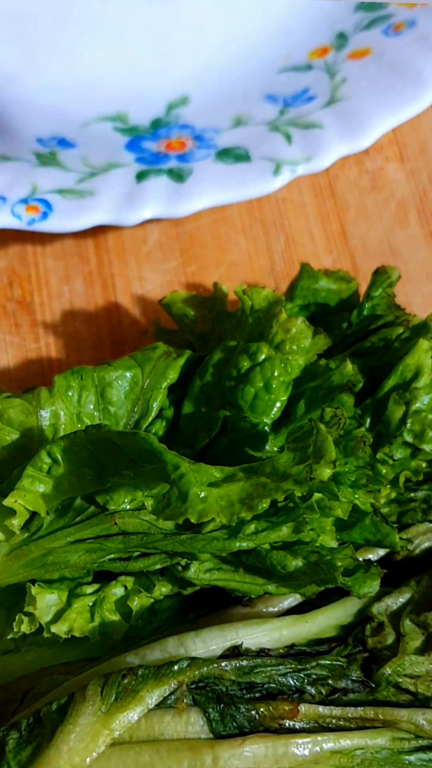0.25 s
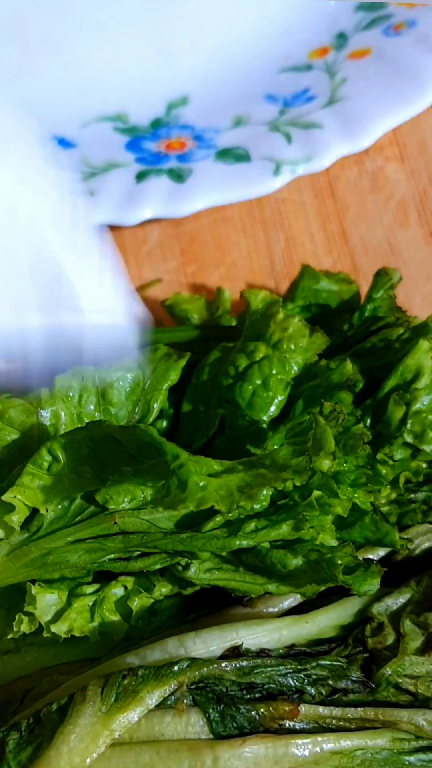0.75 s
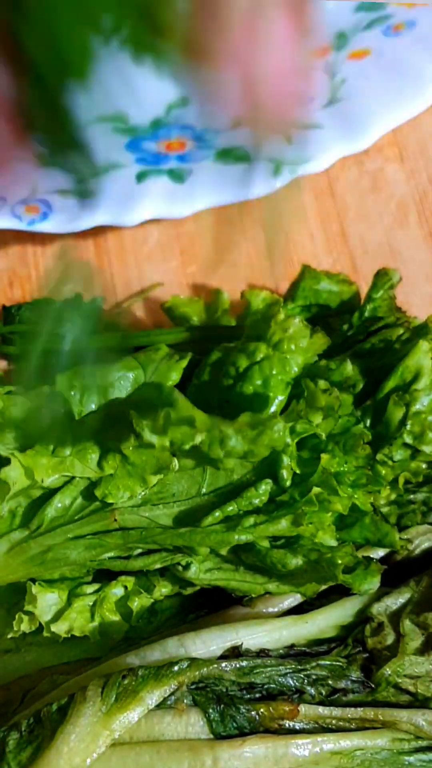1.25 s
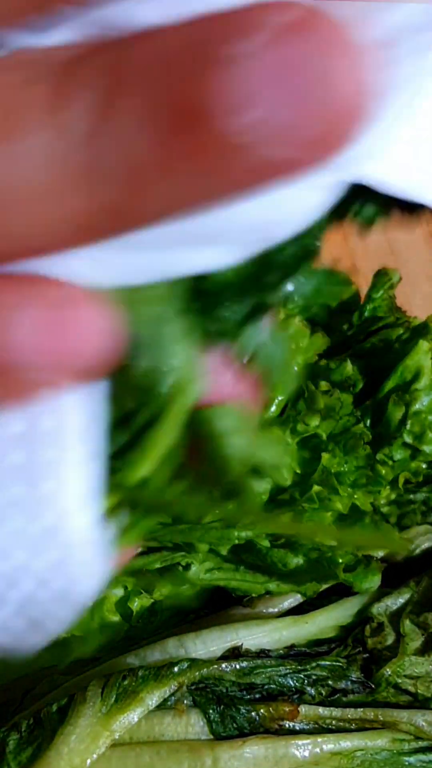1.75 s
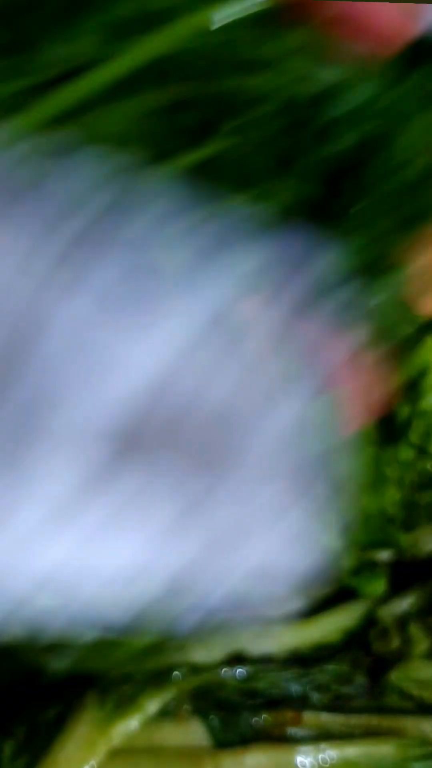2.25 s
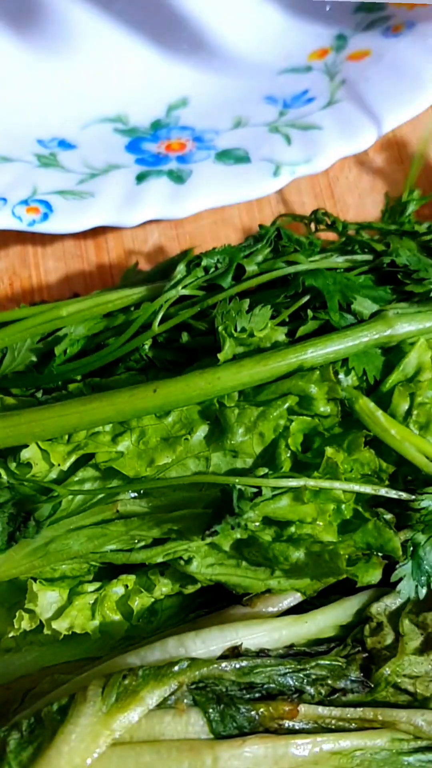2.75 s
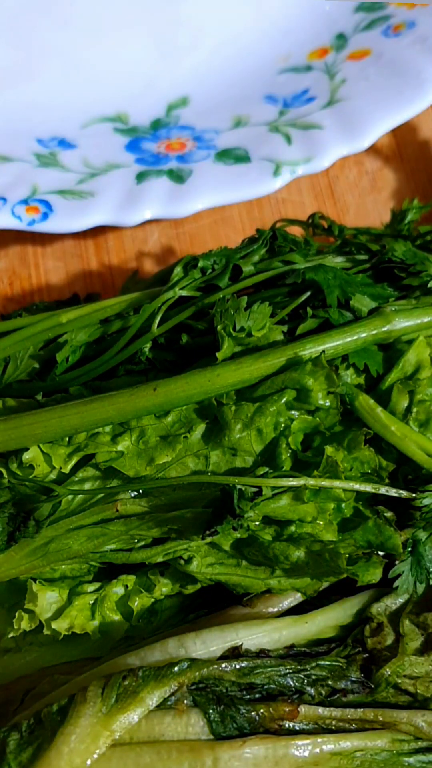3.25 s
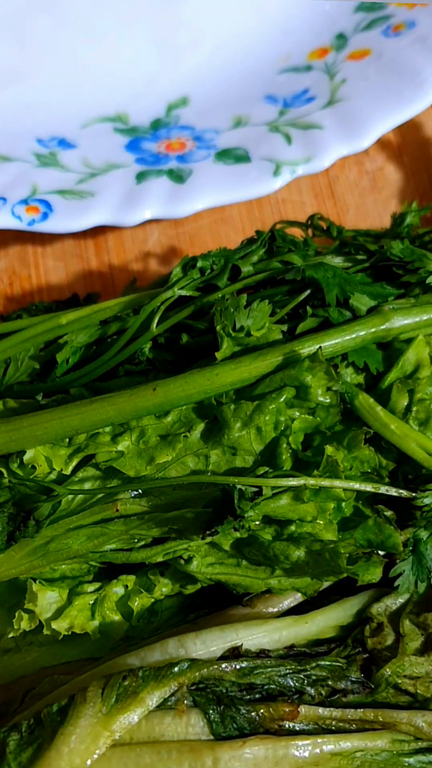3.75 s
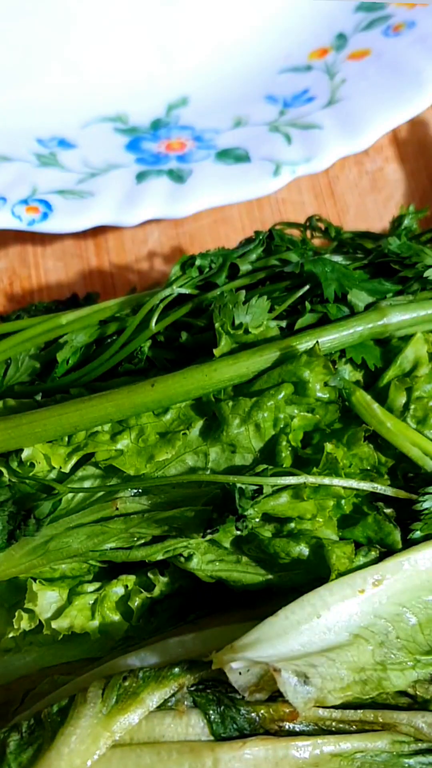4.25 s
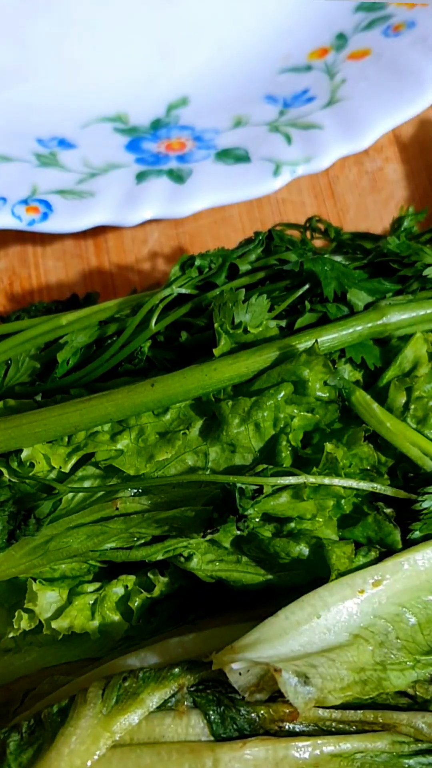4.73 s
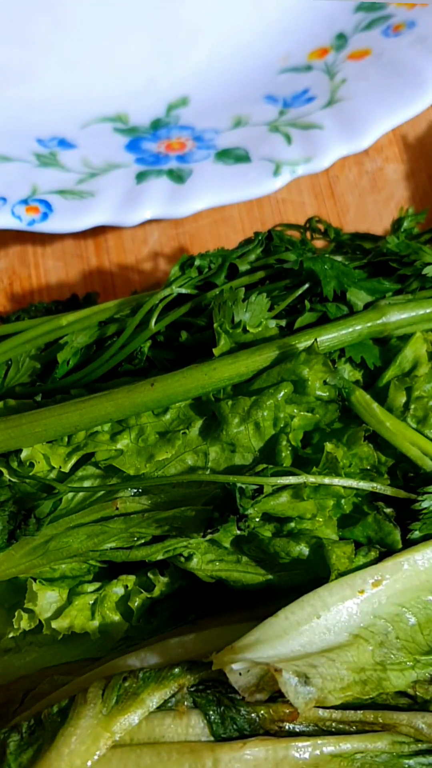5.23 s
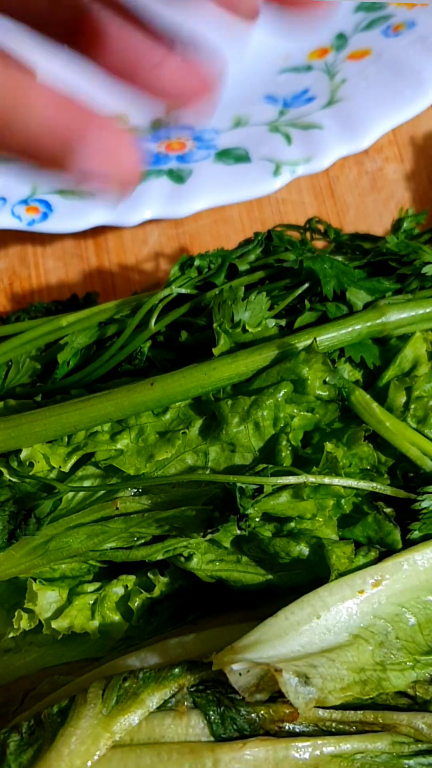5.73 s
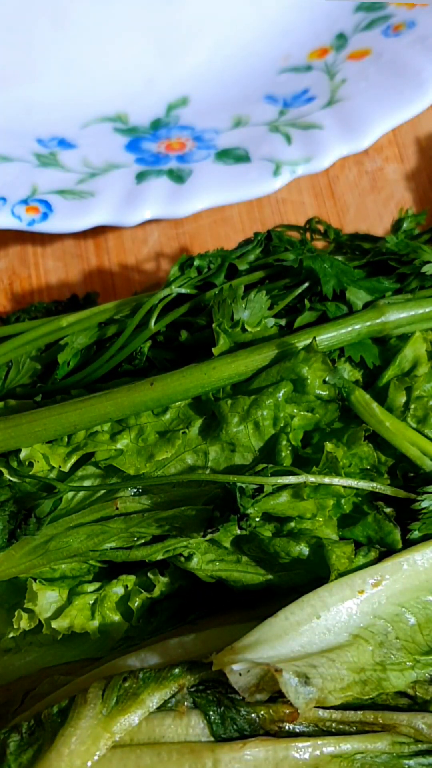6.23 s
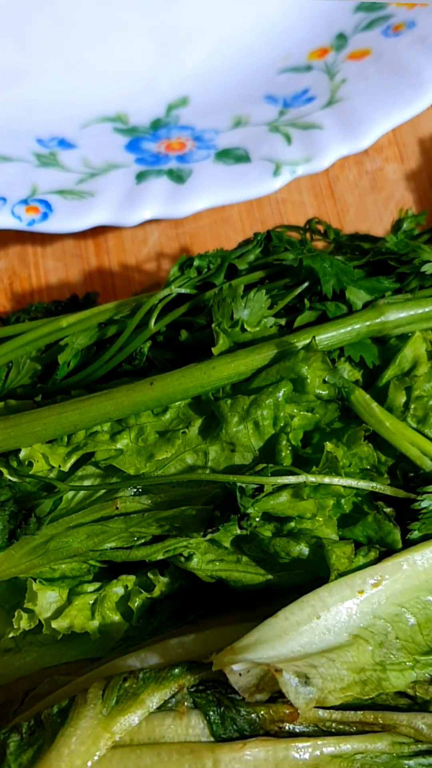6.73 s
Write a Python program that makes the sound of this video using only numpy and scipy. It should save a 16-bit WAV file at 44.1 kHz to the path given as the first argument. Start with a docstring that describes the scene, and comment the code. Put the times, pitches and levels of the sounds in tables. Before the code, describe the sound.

Leafy greens and a paper towel rustle right beside a hand-held microphone, mostly on the left. At first a low handling rumble runs underneath, and several sharp brushes over the microphone bring crisp snaps and puffs of air. The rustling then comes in lighter strokes, pauses for a faint plate clack and dull thuds, and returns as a crackly stretch before thinning out. Quiet kitchen room noise lies behind.

```python
"""Leaves rustle up close, over the low rumble of a hand shifting on a hand-held camera.
Leafy greens are being laid out on a wooden board. Leaves, hand and a paper towel stick and slip
in many tiny clicks near the left microphone opening (the port); several times they brush right
over it and push a puff of air in. Things knock softly in the kitchen, a faint motor hums behind
the low room noise, and a soft rising moan comes in near the end."""
import sys
import numpy as np
from scipy import signal
from scipy.fft import rfft, irfft, next_fast_len
from scipy.io import wavfile
from scipy.ndimage import uniform_filter1d

SR = 44100
rng = np.random.default_rng(int(sys.argv[2]) if len(sys.argv) > 2 else 0)


def dump(signal):
    """Clip the signal to [-1, 1] and save it as 16-bit WAV at the path in sys.argv[1]."""
    limited = np.clip(np.atleast_2d(signal).T, -1, 1)
    pcm = np.round(limited * 32767).astype(np.int16)
    wavfile.write(sys.argv[1], SR, pcm)


N = 307906
T = np.arange(N) / SR
HZ = np.fft.rfftfreq(next_fast_len(N, True), 1 / SR)

# tone colour of the room noise on each side: f/Hz, level/dB
ROOM_LEFT_COLOUR = [(20, -16), (80, 6), (200, -0.5), (350, 8), (450, -1), (620, -3.5), (1300, -15.5),
                    (2400, -15), (4500, -20), (8000, -23), (15000, -29.5)]
ROOM_RIGHT_COLOUR = [(20, -35.5), (45, -2), (85, 5), (150, -2.5), (290, -12.5), (500, -26.5), (1200, -33),
                     (3500, -36), (7500, -50.5), (10500, -45), (15500, -44.5)]
# a far motor swells and fades: t/s, level/dB, rise/s, hold/s, fall/s, f/Hz
MOTOR_SWELLS = [(2.32, -54, .36, 0.06, 0.064, 130.3), (2.744, -59.5, 0.09, .27, 0.18, 127),
                (5.2, -54, 0.27, 0.97, 0.14, 109)]

# touches that make something ring: t/s, level/dB, rise/s, hold/s, fall/s
HOLLOW_KNOCKS = [(2.592, -46, 0.0087, 0.0043, 0.0037), (2.615, -50.5, 0.008, 0.024, 0.031)]
PLATE_CLACKS = [(4.337, -55.5, .004, .04, 0.027), (4.412, -65.5, .008, 0.014, 0.033)]
LOW_THUDS = [(4.36, -46.5, 0.02, 0.012, 0.02), (4.45, -47, 0.028, 0.088, 0.032)]
ROOM_SCRAPES = [(4.79, -52.5, 0.014, 0.052, 0.035), (4.91, -54.5, 0.027, 0.015, 0.024)]
FINGER_SCUFFS = [(.08, -53.5, 0.041, 0.082, 0.059), (4.25, -63.5, 0.033, 0.033, 0.014),
                 (4.63, -61, 0.022, .03, 0.011), (6.67, -57.5, 0.067, 0.03, 0.046),
                 (6.84, -60, 0.095, 0.11, 0.039)]  # on the camera case
STALK_CREAKS = [(.35, -44, 0.0072, 0.032, 0.0075), (.68, -47.5, 0.017, 0.015, 0.017),
                (2.9, -66.5, 0.0095, 0.13, 0.014), (3.68, -60.5, 0.011, 0.017, 0.012),
                (6.56, -58, 0.011, 0.05, 0.03)]
# the tones (modes) each of those things rings at: f/Hz, width/Hz, relative level/dB
KNOCK_TONES = [(608, 110, -3.5), (741, 68, 3), (975, 260, -10.5)]
PLATE_TONES = [(312, 180, -3.5), (834, 140, -7), (1300, 130, -1.5), (1740, 250, -13.5), (2490, 420, -8),
               (4000, 590, -10.5), (5300, 430, -7), (6500, 350, -11.5)]
THUD_TONES = [(44, 12, 0)]
SCRAPE_TONES = [(447, 65, -5), (637, 130, -5.5), (852, 79, -1), (1155, 67, -12), (1590, 140, -15.5)]
SCUFF_TONES = [(363, 52, 2), (509, 120, -6)]
STALK_TONES = [(2090, 700, -4), (3170, 1000, 0)]

# the hand shifts on the case: t/s, length/s, low part level/dB, upper part level/dB
HAND_SHIFTS = [(-.03, 0.53, -47, -45.5), (0.619, .28, -49.5, -47), (.9, 0.8, -51.5, -55),
               (1.666, 0.67, -49, -52.5)]
# tone colour of the low and upper parts of that rumble: f/Hz, level/dB
HAND_LOW_COLOUR = [(15, -26), (40, -2.5), (125, 4.5), (170, -15.5), (260, -21), (600, -67)]
HAND_UPPER_COLOUR = [(80, -10), (190, 5.5), (370, -9), (520, -19.5), (1200, -54)]
# crisp snaps: t/s, peak level/dB
CRISP_SNAPS = [(0.2994, -27), (1.2755, -22), (1.2936, -16), (1.9097, -23), (1.986, -30.5), (3.4539, -30.5),
               (3.594, -38.5), (4.664, -57), (5.127, -39.5), (6.463, -42), (6.816, -53)]
# brushes over the port: t/s, scratch level/dB, treble gain/dB, rise/s, fall/s, air puff level/dB
PORT_BRUSHES = [(0.298, -35, -1, 0.0045, .0068, -25.5), (1.276, -32.5, 1.5, 0.024, 0.018, -21),
                (1.292, -22, 4, 0.0049, .011, -19.5), (1.527, -27.5, -1, 0.013, 0.0097, -22),
                (1.695, -26.5, -2.5, 0.0099, .011, -21.5), (1.913, -26.5, -5, 0.0053, .0065, -22),
                (2.03, -31, 3, 0.0059, 0.0097, -15), (2.147, -35, 2, 0.0055, 0.014, -23.5)]
# tone colour of brushing and of rubbing: f/Hz, level/dB
SCRATCH_COLOUR = [(160, -4.5), (280, 3), (618, -1), (782, -0.5), (990, -8.5), (1670, -5), (2680, -6),
                  (2910, -8), (3810, -5.5), (4220, -10), (5250, -11.5), (7730, -17), (15700, -27)]
RUSTLE_COLOUR = [(240, -35.5), (400, -8), (751, -1.5), (862, -5.5), (1320, -6), (2130, -1), (2300, -1),
                 (2940, -2.5), (3330, 0.5), (4590, -2.5), (6250, -1.5), (8360, -5.5), (12300, -10),
                 (15700, -17.5)]
# a leaf edge catches and lets go: t/s, level/dB
LEAF_CATCHES = [(.236, -61), (.638, -53), (0.921, -59.5), (2.896, -69), (3.006, -66), (3.311, -59),
                (3.753, -41), (3.845, -45.5), (4.331, -62), (5.125, -51), (5.326, -44), (5.449, -50),
                (5.61, -39.5), (5.891, -54), (6.461, -58.5), (6.544, -50), (6.869, -53.5)]
# strokes of rubbing: t/s, length/s, level/dB, growth/dB, body (bass) gain/dB, fizz (treble) gain/dB
RUB_STROKES = [ (-.02, .1, -58, -11, -5.5, -8.5), (.08, 0.16, -72.5, -3, 5, -1.5),
               (.222, 0.074, -62, -2, 1.5, -4.5), (0.276, 0.095, -48, -1, 0, -5),
               (.38, .11, -49, -2.5, -4.5, -8.5), (.49, 0.22, -61, 10, -8, -2.5),
               (0.611, 0.11, -48, 1, -7.5, -4.5), (0.733, 0.035, -41.5, -4.5, -15.5, -5.5),
               (.79, 0.1, -68, 2, 1.5, -7), (.902, 0.091, -59.5, 2.5, -2, -10),
               (1.0, 0.077, -66.5, 0, -4, -3), (1.1, 0.086, -70.5, 2, 2.5, -2),
               (1.185, .072, -53.5, 16, -7.5, -8.5), (1.31, .14, -54.5, -0.5, -5.5, -9.5),
               (1.46, 0.039, -51.5, -2, -8, -6), (1.541, 0.083, -56, -8.5, -6.5, -8),
               (1.71, 0.12, -54, 13, -9.5, -8), (1.84, 0.088, -60.5, 8, -9, -5),
               (1.927, 0.053, -56, 13.5, -7.5, -10), (2.05, 0.05, -55, 3, -8, -8),
               (2.155, 0.057, -56.5, 8, -6.5, -6.5), (2.23, 0.37, -77, 3, 4, 3.5),
               (2.671, 0.067, -79, -2, 3, 6), (2.882, 0.075, -67.5, -13, 2.5, -10.5),
               (2.988, 0.036, -63, -3, -2, -8), (3.08, 0.076, -82, -3, 14.5, -9),
               (3.27, 0.065, -70.5, 17, 1, 2), (3.324, 0.13, -52.5, 0, -7.5, -4.5),
               (3.47, 0.11, -67.5, 9, -6, -1), (3.538, 0.069, -55.5, 6.5, -8.5, -5),
               (3.62, 0.14, -61, 8, -4, -3), (3.735, 0.16, -53.5, -4, -6.5, -5.5),
               (4.032, 0.02, -69, 4.5, -12, 5), (4.6, .16, -71.5, 7, -6, -4),
               (4.855, 0.31, -53.5, 4, -6.5, -7.5), (5.1, .16, -52.5, 1.5, -8, -8),
               (5.273, 0.049, -53, 10, -8.5, -1), (5.315, .1, -40, -8.5, -9.5, -5.5),
               (5.439, .15, -47, -5, -11.5, -5), (5.596, 0.055, -45.5, -0.5, -11, -2),
               (5.664, 0.045, -49, 3, -9.5, -1.5), (5.735, 0.11, -49.5, 3.5, -13.5, -7),
               (5.872, 0.04, -55, -7, -22, -1.5), (5.93, 0.12, -73, -6, -6, -7),
               (6.032, 0.13, -60, -4, -10.5, -10), (6.172, 0.049, -64, -1, -10, -9),
               (6.25, .27, -71, 2, -9, -2), (6.439, 0.024, -57.5, 7, -19, -8),
               (6.525, 0.078, -54.5, -4, -15, -3.5), (6.61, 0.19, -58.5, 3, -9.5, -6.5),
               (6.795, 0.17, -58.5, 0, -23, -3.5)]
# what reaches the far (right) port from the near (left) one: f/Hz, gain/dB
FAR_PORT_GAIN = [(60, -13), (250, -8.5), (600, -24), (1000, -21.5), (1650, -22), (2600, -26.5),
                 (3300, -26.5), (4600, -27), (6300, -34), (7700, -32.5), (9700, -16.5), (11500, -21),
                 (15000, -31.5)]


def amp(db):
    return 10 ** (np.asarray(db) / 20)


def unit(x):
    """Scale a signal to an average (RMS) size of 1."""
    return x / np.sqrt(np.mean(x ** 2) + 1e-20)


def shape(points):
    """Gain at every frequency, drawn through a few (Hz, dB) points."""
    hz, db = np.transpose(points)
    return amp(np.interp(np.log(HZ + 1), np.log(hz), db))


def peak(hz, width):
    """Gain that favours one ringing tone."""
    return 1 / (1 + (2 * (HZ - hz) / width) ** 2)


def below(hz, steepness):
    """Gain that lets through what lies below hz."""
    return 1 / (1 + (HZ / hz) ** steepness)


def filtered(x, gain):
    size = next_fast_len(N, True)
    return irfft(rfft(x, size) * gain, size)[:N]


def noise(gain):
    return unit(filtered(rng.standard_normal(N), gain))


def wander(hz):
    """A random drift of size 1, changing up to about hz times a second."""
    return noise(below(hz, 4))


def swell(s, rise, hold, fall):
    """Loudness curve that grows to 1 at time s, holds and dies away."""
    return np.exp(-(np.maximum(s - T, 0) / rise) ** 1.73 - np.maximum(T - s - hold, 0) / fall)


def stroke(start, length, growth_db, attack, release):
    """Loudness curve of a slide: a quick start, an even growth or decline, then a fade."""
    t = T - start
    hold = amp(growth_db * (np.clip(t / length, 0, 1) - .5))
    return np.clip(t / attack, 0, 1) * hold * np.exp(-np.maximum(t - length, 0) / release)


def room_noise():
    """Low, slightly wavering noise, different on each side."""
    left = amp(-68) * noise(shape(ROOM_LEFT_COLOUR)) * amp(1.3 * wander(3.6))
    right = amp(-56) * noise(shape(ROOM_RIGHT_COLOUR)) * amp(.5 * wander(13))
    return np.array([left, right])


def moan(start=6.15, start_hz=188.7, climb_hz_per_s=92):
    """Two soft bands of noise come in and climb in pitch together."""
    hz = start_hz + climb_hz_per_s * (T - start)
    phase = 2 * np.pi * np.cumsum(hz) / SR
    level = amp(-65.5) * swell(start, rise=.13, hold=1, fall=1)
    lower = level * unit(wander(25) * np.cos(phase))
    upper = level * unit(wander(78) * np.cos(1.6 * phase))
    return amp([[-14], [0]]) * lower + amp([[-7], [-12]]) * upper  # left and right gains


def motor(sag_hz_per_s=2):
    """A far motor's wavering hum, mostly on the right; its pitch sags during each swell."""
    drift, hum = 1 + 0.017 * wander(11.2), np.zeros(N)
    for s, db, rise, hold, fall, hz in MOTOR_SWELLS:
        pitch = (hz - sag_hz_per_s * (T - s)) * drift
        tone = np.sqrt(2) * np.sin(2 * np.pi * np.cumsum(pitch) / SR)
        hum += amp(db) * swell(s, rise, hold, fall) * tone
    return amp([[-16], [0]]) * hum * amp(1.5 * wander(8))


def kitchen_echo(x, t60):
    """Short blurred echo from counter and walls, falling 60 dB in t60 seconds."""
    t = np.arange(SR // 3) / SR
    tail = rng.standard_normal(len(t)) * amp(-60 * t / t60) * (t > .001)
    return signal.oaconvolve(x, tail / np.linalg.norm(tail))[:N]


def ringing(touches, tones, ports_db):
    """Rough contact keeps a thing's tones ringing; each port hears its own mix."""
    hz, width, db = np.transpose(tones)
    share = amp(db) / np.linalg.norm(amp(db))
    out = np.zeros((len(ports_db), N))
    for k in range(len(tones)):
        linger = np.sqrt(width.min() / width[k])  # wide tones die sooner
        force = sum(amp(level_db) * swell(s, rise, hold, fall * linger)
                    for s, level_db, rise, hold, fall in touches)
        for channel in out:
            channel += share[k] * np.std(force) * unit(force * noise(peak(hz[k], width[k])))
    return amp(ports_db)[:, None] * out


def knocks():
    """Things are bumped or scraped and ring briefly, each with its left and right gain."""
    return (ringing(HOLLOW_KNOCKS, KNOCK_TONES, ports_db=[0, -13])
            + ringing(PLATE_CLACKS, PLATE_TONES, ports_db=[0, -7])
            + ringing(LOW_THUDS, THUD_TONES, ports_db=[-32, 0])
            + ringing(ROOM_SCRAPES, SCRAPE_TONES, ports_db=[0, -11])
            + ringing(FINGER_SCUFFS, SCUFF_TONES, ports_db=[0, -12]))


def hand_rumble():
    """The hand creeps over the camera case and rumbles until it settles."""
    low, upper = noise(shape(HAND_LOW_COLOUR)), noise(shape(HAND_UPPER_COLOUR))
    out = np.zeros(N)
    for start, length, low_db, upper_db in HAND_SHIFTS:
        shift = stroke(start, length, growth_db=0, attack=0.025, release=0.056)
        out += shift * (amp(low_db) * low + amp(upper_db) * upper)
    return out


def far_port(near, hand, delay_s=.0004):
    """The right port hears the same contact later, weaker and with more of the room."""
    delay = np.exp(-2j * np.pi * HZ * delay_s)
    early_echo = filtered(kitchen_echo(near, t60=.04), HZ / (HZ + 400))
    arriving = .7 * (near + early_echo) + amp(-2) * kitchen_echo(near, t60=0.1)
    return filtered(arriving, delay * shape(FAR_PORT_GAIN)) + amp(-13.5) * filtered(hand, delay)


def creaking():
    """Stalks creak as they slide."""
    return ringing(STALK_CREAKS, STALK_TONES, ports_db=[0])[0]


def snapping(fall_s=0.0011):
    """Single crisp cracks, each a tiny burst of noise."""
    out, t = np.zeros(N), np.arange(256) / SR
    soften = signal.butter(2, 7000, fs=SR)
    for s, db in CRISP_SNAPS:
        crack = signal.lfilter(*soften, rng.standard_normal(len(t)) * np.exp(-t / fall_s))
        out[round(s * SR):][:len(t)] += amp(db) * crack / abs(crack).max()
    return out


def slips(per_s, spread_db, clump_db, clump_hz, patchy_db):
    """Surfaces stick and let go in clumps of tiny clicks; the shifting contact changes their colour."""
    size = amp(spread_db * np.minimum(rng.exponential(1, N), 4))
    clicks = size * rng.standard_normal(N) * (rng.random(N) < per_s / SR)
    clicks *= amp(clump_db * wander(clump_hz))
    spectra = signal.stft(clicks, nperseg=512)[2]
    # random louder and softer patches, smoothed over frequency and then over time
    patches = uniform_filter1d(rng.standard_normal(spectra.shape), size=6, axis=0)
    patches = unit(uniform_filter1d(patches, size=8, axis=1))
    return signal.istft(spectra * amp(patchy_db * patches))[1][:N]


def brushing(puff_hz=71.9, puff_width_s=0.0066, puff_delay_s=0.0032):
    """Each pass over the port scratches it and shoves a short puff of air into it."""
    clicks = slips(per_s=12000, spread_db=3.5, clump_db=0, clump_hz=250, patchy_db=3.5)
    scratch = unit(filtered(clicks, shape(SCRATCH_COLOUR)))
    dull = filtered(scratch, below(6000, 4))
    fizz = scratch - dull
    out = np.zeros(N)
    for s, db, fizz_db, rise, fall, puff_db in PORT_BRUSHES:
        out += amp(db) * swell(s, rise, 0, fall) * (dull + amp(fizz_db) * fizz)
        t = T - s - puff_delay_s
        out += amp(puff_db) * np.exp(-(t / puff_width_s) ** 2) * np.sin(2 * np.pi * puff_hz * t)
    return out


def rubbing():
    """Leaves and paper slide in strokes, each with its own mix of low body and high fizz; edges catch."""
    case_ring = amp(-11) * peak(hz=1470, width=480)  # the camera case rings faintly
    colour = shape(RUSTLE_COLOUR) * (1 + case_ring)
    fine_slips = slips(per_s=9000, spread_db=-1, clump_db=1.3, clump_hz=84.5, patchy_db=2)
    rustle = filtered(fine_slips, colour)
    body, fizz = below(1300, 8), 1 - below(5400, 6)
    bands = np.array([unit(filtered(rustle, band)) for band in (body, 1 - body - fizz, fizz)])
    power = np.zeros((3, N))
    for start, length, db, growth_db, body_db, fizz_db in RUB_STROKES:
        level = amp(db) * stroke(start, length, growth_db, attack=0.023, release=.018)
        power += np.outer(amp([body_db, 0, fizz_db]) ** 2, level ** 2)
    slide = (np.sqrt(power) * bands).sum(axis=0)
    rough_slips = slips(per_s=5000, spread_db=2.2, clump_db=1.3, clump_hz=200, patchy_db=2)
    crackle = unit(filtered(rough_slips, colour))
    catches = sum(amp(db) * swell(s, rise=0.0015, hold=0, fall=0.0098) for s, db in LEAF_CATCHES)
    return slide + crackle * catches


def scene():
    """Close sounds on the left, their faint copy on the right, and the kitchen around them."""
    near = rubbing() + brushing() + snapping() + creaking()
    hand = hand_rumble()
    contact = np.array([near + hand, far_port(near, hand)])
    return contact + knocks() + room_noise() + moan() + motor()


def record(dry):
    """Cut off the very highest treble."""
    lowpass = signal.firwin(701, cutoff=15830, window=("kaiser", 9), fs=SR)
    return signal.oaconvolve(dry, lowpass[None], "same")


dry = scene()
out = record(dry)
dump(out)
```